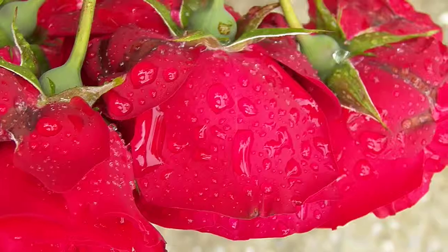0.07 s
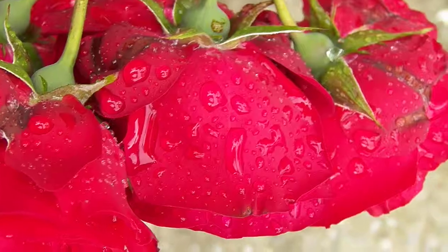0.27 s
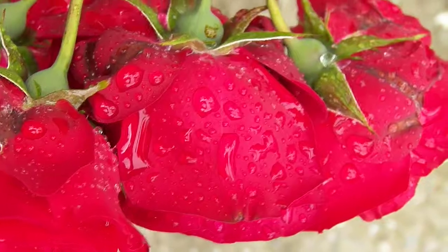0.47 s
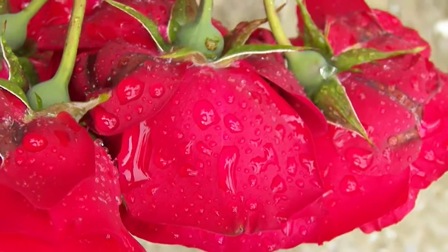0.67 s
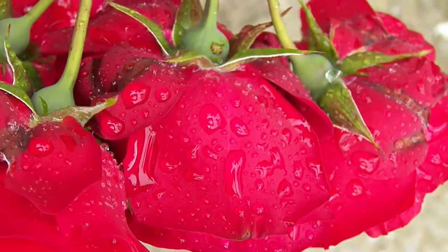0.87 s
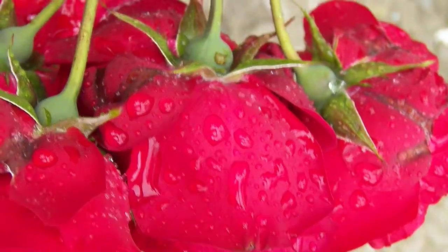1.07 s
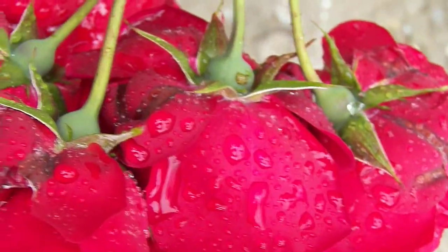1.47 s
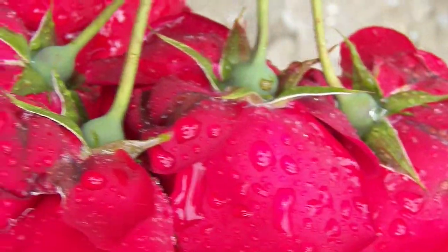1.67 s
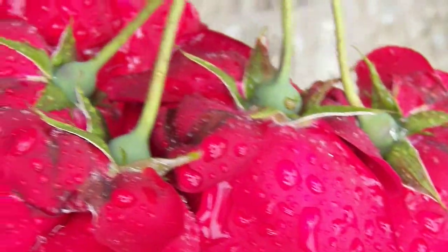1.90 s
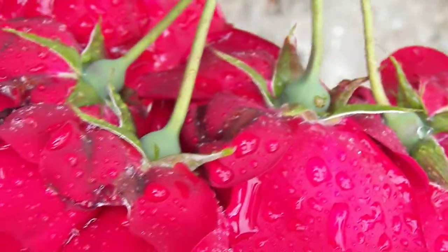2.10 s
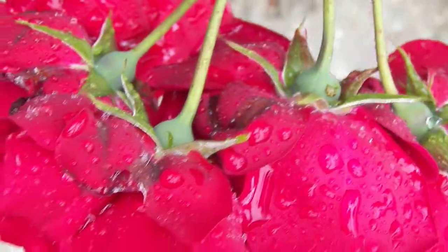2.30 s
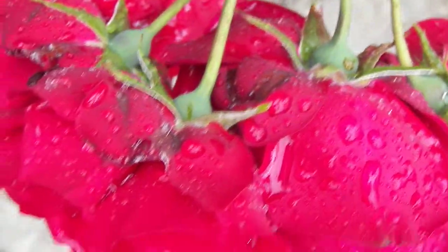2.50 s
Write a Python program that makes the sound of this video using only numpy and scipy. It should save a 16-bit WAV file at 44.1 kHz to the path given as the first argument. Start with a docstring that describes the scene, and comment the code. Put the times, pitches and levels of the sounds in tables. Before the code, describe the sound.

Buzzy chirps of small birds, probably sparrows, in a garden with soft steady background noise.

```python
"""Small birds, probably sparrows, chirp in a walled garden; a farther one calls twice.
Each chirp is a quick run of buzzy gliding notes that the walls and plants scatter.
Under them lie a low distant rumble, a steady hiss, a faint hum and a thin whine.
A few soft bumps come in the second half."""
import sys
import numpy as np
from scipy import signal
from scipy.fft import rfft, irfft
from scipy.io import wavfile
from scipy.ndimage import uniform_filter1d

SR = 44100
rng = np.random.default_rng(int(sys.argv[2]) if len(sys.argv) > 2 else 0)


def store_pcm(level_fs):
    """Save levels as 16-bit WAV."""
    pcm = np.round(np.clip(level_fs, -1, 1) * 32767).astype(np.int16)
    wavfile.write(sys.argv[1], SR, np.atleast_2d(pcm).T)


N = 116865


def amp(db):
    """Turns decibels into a number to multiply by."""
    return 10 ** (np.asarray(db) / 20)


def unit(x):
    """Scales a signal to an average strength (rms) of 1."""
    return x / np.sqrt(np.mean(x ** 2) + 1e-20)


def read(points, hz):
    """Reads between a table's rows, with the octaves evenly spaced."""
    f, value = np.transpose(points)
    return np.interp(np.log(hz + 1), np.log(f + 1), value)


def add(mix, start_s, sound):
    """Mixes in a stereo sound at start_s."""
    part = mix[:, round(start_s * SR):][:, :sound.shape[1]]
    part += sound[:, :part.shape[1]]


def wander(hz):
    """A smooth random wobble, mostly slower than hz."""
    f = np.fft.rfftfreq(N, 1 / SR)
    return unit(irfft(rfft(rng.standard_normal(N)) / (1 + (f / hz) ** 4), N))


# How alike the two sides sound (1 = the same): frequency_hz, likeness
SIDE_LIKENESS = [(40, 1), (120, 0.78), (350, 0.93), (700, .7), (1400, 0.36), (3000, 0.27), (8000, 0.016),
                 (15000, 0.027)]
# Which side is louder: frequency_hz, left_minus_right_db
SIDE_BALANCE = [(50, -3), (300, 2.5), (1000, 2), (4000, -0.5), (15000, 0.5)]
def outdoor_noise(spectrum, level_db, patch_db=1.04, drift_db=-1):
    """Steady noise with faint drifting patches, alike on both sides in the bass."""
    frames, hz = N // 512 + 5, np.fft.rfftfreq(2048, 1 / SR)
    a, b, c, d, patches = rng.standard_normal((frames, len(hz), 5)).T
    patches = unit(uniform_filter1d(uniform_filter1d(patches, size=14, axis=0), size=7, axis=1))
    same = read(SIDE_LIKENESS, hz)[:, None]
    lean = amp(read(SIDE_BALANCE, hz) / 2)[:, None]
    left = a + 1j * b
    right = same * left + np.sqrt(1 - same ** 2) * (c + 1j * d)
    bands = np.array([left * lean, right / lean]) * amp(read(spectrum, hz)[:, None] + patch_db * patches)
    noise = signal.istft(bands, nperseg=2048, noverlap=1536)[1][:, :N]
    return unit(noise) * amp(level_db + drift_db * wander(2.7))


# The rumble's tone colour: frequency_hz, relative_level_db
RUMBLE_COLOUR = [(15, -38), (25, -22), (37, -32), (58, -20), (76, -8), (173, -12.5), (239, -14.5),
                 (318, -11.5), (346, -5), (383, -2), (431, -2.5), (485, -6), (527, -5.5), (573, -9),
                 (1020, -9), (1400, -16), (1820, -22), (3080, -120)]
# Its slow rise and fall: time_s, gain_db
RUMBLE_SWELL = [(.1, -1.5), (.4, 0.1), (.9, -1), (1.45, 0.06), (2.1, 1), (2.65, 0.5)]
def rumble():
    """Low distant noise that gently swells and sinks."""
    swell = amp(np.interp(np.arange(N) / SR, *np.transpose(RUMBLE_SWELL)))
    return swell * outdoor_noise(RUMBLE_COLOUR, level_db=-53)


# The hiss's tone colour: frequency_hz, relative_level_db
HISS_COLOUR = [(800, -15.5), (1300, -11), (1700, -6.5), (2300, -9.5), (2800, -9.5), (3700, -4),
               (4700, -6.5), (6000, -11.5), (9000, -9), (12500, -7.5), (15800, -7)]
def hiss():
    """Soft, even noise reaching into the high treble."""
    return outdoor_noise(HISS_COLOUR, level_db=-54.5)


# Faint lasting tones: pitch_hz, level_db, wobble_hz
STEADY_TONES = [(174, -74, 6), (523, -69, 12), (15734, -77, 4)]
def hum_and_whine():
    """Two low tones and a very high one, wavering in pitch and loudness."""
    out, t = np.zeros(N), np.arange(N) / SR
    for hz, level_db, wobble_hz in STEADY_TONES:
        cycles = hz * t + np.cumsum(wobble_hz * wander(19.6)) / SR
        out += amp(level_db) * unit(np.sin(2 * np.pi * cycles) * (1 + 0.17 * wander(24)))
    return out


# Weaker tones around each note: multiple_of_half_pitch, level_db, extra_db_if_fully_scattered
SIDE_TONES = [(1, -22.5, 6.5), (3, -19.5, 3), (4, -29, 4)]
# How throat and beak colour the voice: frequency_hz, gain_db
THROAT_COLOUR = [(1000, 19), (1750, 2), (2250, -0.5), (2900, 2), (4000, 0), (5200, 0.5), (7000, -3),
                 (10000, -3)]
def sing(notes, buzz_hz=326.8, buzz_depth=0.048, jitter_depth=0.0945, flutter=0.47, leaf_share=.4):
    """Notes glide through three pitches, shaken by a fast uneven buzz; leaves and walls scatter them."""
    direct, indirect = np.zeros((2, 2, N))
    jitter, uneven = wander(702), wander(55.6)
    buzz = np.sin(2 * np.pi * np.cumsum(buzz_hz * (1 + 0.2048 * uneven)) / SR)
    for start_s, length_s, first, middle, last, level_db, rough, pan_db, share in notes:
        progress = np.arange(0, length_s, 1 / SR) / length_s
        at = round(start_s * SR) + np.arange(len(progress))
        glide_hz = np.polyval(np.polyfit([0, .5, 1], [first, middle, last], 2), progress)
        shake = rough * (buzz_depth * buzz[at] + jitter_depth * jitter[at])
        half_phase = np.pi * np.cumsum(glide_hz * (1 + shake)) / SR
        voice = np.sin(2 * half_phase)
        voice += sum(amp(db + extra * share) * np.sin(k * half_phase) for k, db, extra in SIDE_TONES)
        voice = unit(voice * (1 + flutter * rough * buzz[at]))
        swell = abs(np.sin(np.pi * progress)) ** np.where(progress < .5, 1.1, .9)
        note = amp([[level_db + pan_db / 2], [level_db - pan_db / 2]]) * voice * swell
        add(direct, start_s, np.sqrt(1 - share) * note)
        add(indirect, start_s, np.sqrt(share) * note)
    off_leaves = np.sqrt(leaf_share) * scatter(direct, decay_s=.005)
    heard = np.sqrt(1 - leaf_share) * direct + off_leaves + scatter(indirect, decay_s=.02)
    return irfft(rfft(heard) * amp(read(THROAT_COLOUR, np.fft.rfftfreq(N, 1 / SR))), N)


# The near birds' notes (roughness 0 is a smooth whistle): start_s, length_s, first_hz, middle_hz,
# last_hz, level_db (before throat colour), roughness, left_minus_right_db, scattered_share
NEAR_NOTES = [ (.162, 0.0225, 3830, 3698, 3550, -42, 0.42, -10, 0.24),
              (.188, 0.022, 3565, 3347, 2900, -43.5, 0.6, 2, 0.42),
              (.202, 0.053, 5300, 5040, 4500, -57, .35, 6, .3),
              (.234, .040, 4330, 4560, 5100, -44, .7, 1, 0.2),
              (.255, 0.025, 3600, 3575, 3130, -41, 0.54, 0, 0),
              (.274, 0.035, 3516, 3096, 2570, -47, 0.65, -2, 0.42),
              (.416, .048, 4280, 4620, 5240, -43.5, 0.65, -1, 0.36),
              (.449, 0.023, 3970, 3830, 3630, -34, 0.56, -6.5, 0.12),
              (.474, 0.031, 3360, 3070, 2870, -46, 0.65, -2, 0.27),
              (.955, 0.024, 5000, 4480, 4100, -43, 1.06, -4, 0.54),
              (.967, .037, 3840, 4278, 4910, -36, 0.71, -2, 0.2),
              (.992, 0.028, 3884, 3586, 3350, -31.5, 0.6, -1.5, 0),
              (1.016, 0.033, 3380, 2976, 2340, -41.5, 0.71, 1, 0.3),
              (1.066, 0.055, 3820, 4150, 4320, -44, 1.11, 4, 0.9),
              (1.098, 0.047, 3840, 3750, 3700, -41, 0.71, 7, 0.65),
              (1.148, 0.036, 3230, 3366, 3330, -46.5, 0.54, 3, 0.4),
              (1.166, 0.03, 3890, 3860, 3220, -52.5, .4, 3, 0.1),
              (1.278, 0.053, 3460, 3675, 3280, -41.5, 0.56, -1.5, 0.25),
              (1.318, 0.04, 3814, 3370, 2445, -47.5, 0.52, 2, 0.3),
              (1.954, 0.032, 4330, 4290, 4000, -45, 0.86, 2, 0.65),
              (1.970, 0.068, 3796, 3686, 3570, -38.5, 0.83, 4.5, 0.77),
              (2.008, 0.0306, 3720, 4060, 3450, -45, 0.1, -2, .3),
              (2.028, 0.034, 3902, 3623, 3170, -40, 0.77, 0, 0.62),
              (2.058, 0.043, 3547, 3220, 2590, -48, 0.71, -1, 0.5),
              (2.118, 0.04, 4060, 4320, 3870, -46, 1.11, 5, 0.75),
              (2.140, 0.053, 3580, 3837, 3574, -36, 0.73, 4.5, 0.7),
              (2.196, 0.024, 3375, 3363, 3330, -41, 0.65, 6, 0.42),
              (2.234, 0.052, 3425, 3850, 3493, -42.5, 0.87, -4, 0.3),
              (2.278, 0.036, 3592, 3464, 2970, -45.5, 0.77, 0, 0),
              (2.292, 0.017, 5260, 4900, 3900, -56, .1, 4, .1),
              (2.336, 0.035, 3360, 3950, 4810, -58.5, 0.26, 25, 0.2),
              (2.366, 0.02, 4780, 4670, 3870, -58.5, 0.05, 19, 0.05), ]
# The far bird's notes: same columns
FAR_NOTES = [ (.605, 0.093, 4487, 4500, 4290, -50, 0.52, 6.5, 0.51),
             (.678, 0.095, 4150, 3960, 3850, -48, 0.72, 3.5, 0.26),
             (1.612, 0.099, 5160, 4830, 4560, -54.5, 0.97, 7.1, 0.3),
             (1.630, 0.083, 4440, 4446, 4475, -50, 0.23, 7.5, 0.067),
             (1.668, .135, 4350, 3958, 3740, -49.5, 0.88, 5.6, 0.4), ]
def birds():
    """The far bird carries more echo; the echo shifts gently, so it sounds soft rather than ringing."""
    near, far = sing(NEAR_NOTES), sing(FAR_NOTES)
    to_echo = amp(-6) * near + amp(-2) * far
    blend = np.pi / 2 * wander(hz=18)
    return near + far + np.cos(blend) * garden_echo(to_echo) + np.sin(blend) * garden_echo(to_echo)


def scatter(x, decay_s, echoes_per_s=1500):
    """A cloud of quick, fading echoes off nearby surfaces."""
    t = np.arange(SR // 5) / SR
    echoes = rng.choice([-1., 1.], (2, len(t))) * (rng.random((2, len(t))) < echoes_per_s / SR)
    echoes *= np.exp(-t / decay_s) * (t > .001)
    echoes /= np.linalg.norm(echoes, axis=1, keepdims=True) + 1e-9
    return signal.fftconvolve(x, echoes, axes=1)[:, :N]


# How long the garden's echo takes to fall by 60 dB: frequency_hz, fade_s
ECHO_FADE = [(1500, 0.34), (3500, 0.68), (6000, 0.49)]
def garden_echo(x, build_s=0.028):
    """Many echoes blur into a tail, each frequency dying at its own speed."""
    hz, t, bands = signal.stft(rng.standard_normal((2, SR)), SR, nperseg=256)
    fade = amp(-60 * t / read(ECHO_FADE, hz)[:, None])
    tail = signal.istft(bands * fade * np.minimum(t / build_s, 1), SR, nperseg=256)[1]
    return signal.fftconvolve(x.mean(0)[None], tail / np.linalg.norm(tail[0]), axes=1)[:, :N]


# Soft bumps: start_s, pitch_hz, half_rise_s, level_db
SOFT_BUMPS = [(1.746, 385, 0.0022, -36.5), (2.358, 72.5, 0.018, -57.5), (2.505, 69, 0.0075, -66)]
def bumps(thud_hz=129, thud_db=-21.5, echo_db=-3.5):
    """Dull knocks that die quickly, each with a faint thud under it."""
    out, t = np.zeros((2, N)), np.arange(SR // 4) / SR
    push = t * np.exp(-t / 0.0087)
    thud = amp(thud_db) * push / push.max() * np.sin(2 * np.pi * thud_hz * t)
    for start_s, hz, half_rise_s, level_db in SOFT_BUMPS:
        shape = (t / half_rise_s) ** 2 * np.exp(-t / half_rise_s)
        knock = shape / shape.max() * np.sin(2 * np.pi * hz * t)
        add(out, start_s, np.ones((2, 1)) * amp(level_db) * (knock + thud))
    return out + amp(echo_db) * garden_echo(out)


def scene():
    """Birds over the garden's background."""
    return birds() + rumble() + hiss() + hum_and_whine() + bumps()


def record(dry, open_s=.101, fade_db_per_s=2500, low_cut_hz=48, high_cut_hz=15900):
    """The sound fades in quickly; the deepest bass and the highest treble are cut away."""
    fade_in = amp(fade_db_per_s * np.minimum(np.arange(N) / SR - open_s, 0))
    heard = signal.sosfilt(signal.butter(2, low_cut_hz, "high", fs=SR, output="sos"), dry * fade_in)
    treble_cut = signal.firwin(1023, high_cut_hz, window=("kaiser", 9), fs=SR)
    return signal.oaconvolve(heard, treble_cut[None], "same")


dry = scene()
out = record(dry)
store_pcm(out)
```